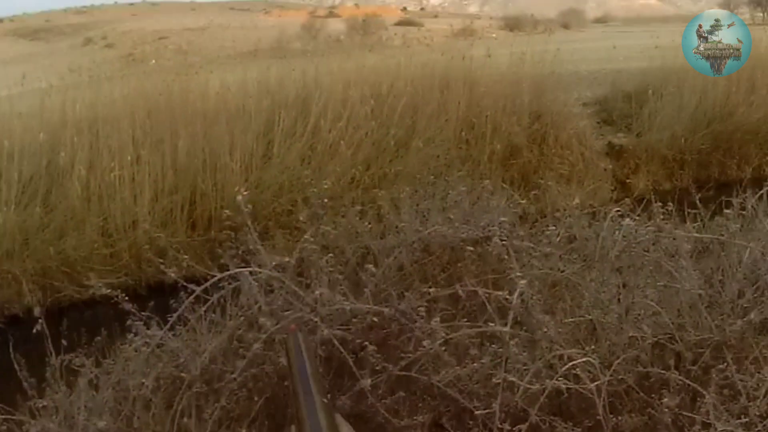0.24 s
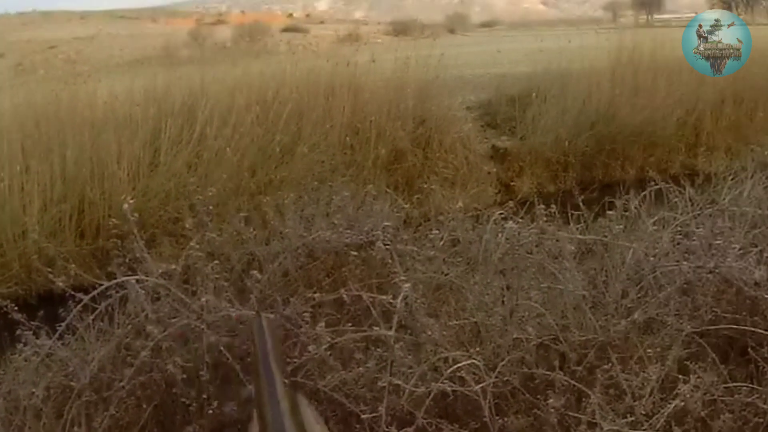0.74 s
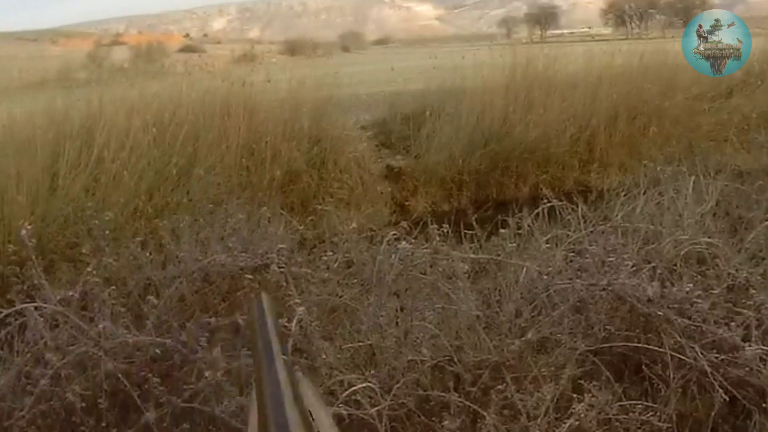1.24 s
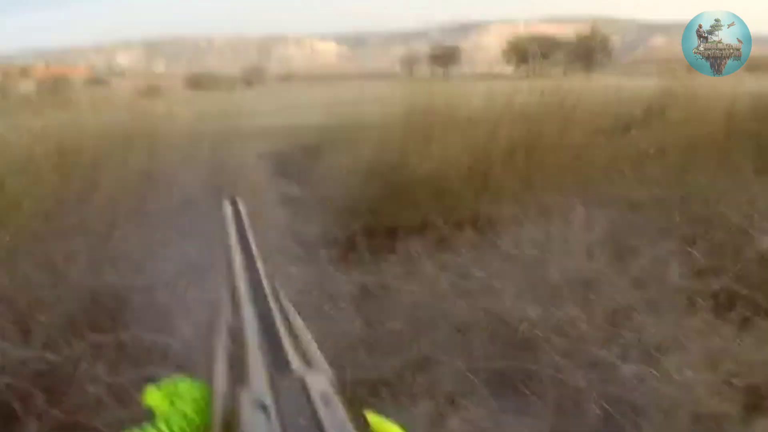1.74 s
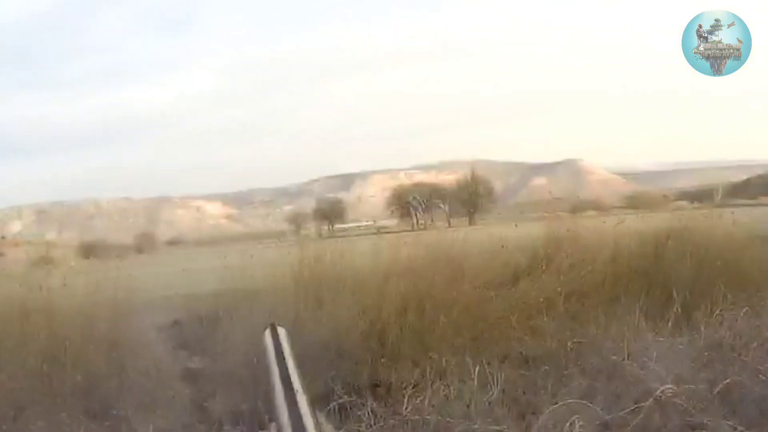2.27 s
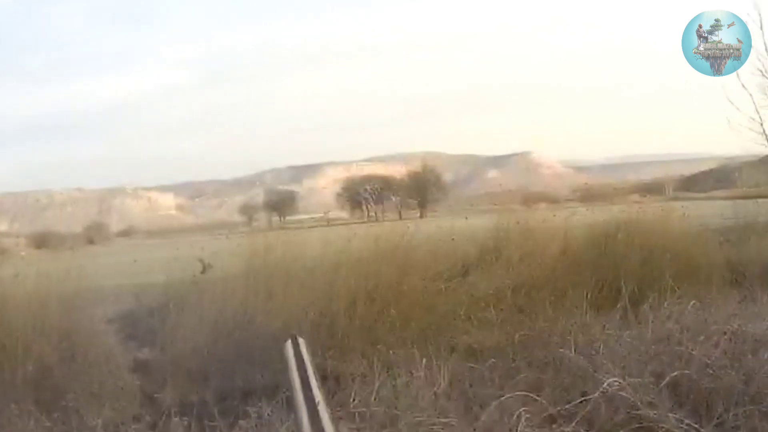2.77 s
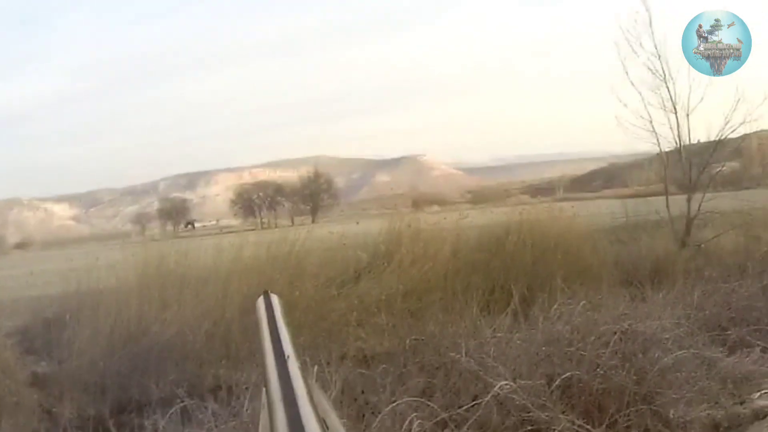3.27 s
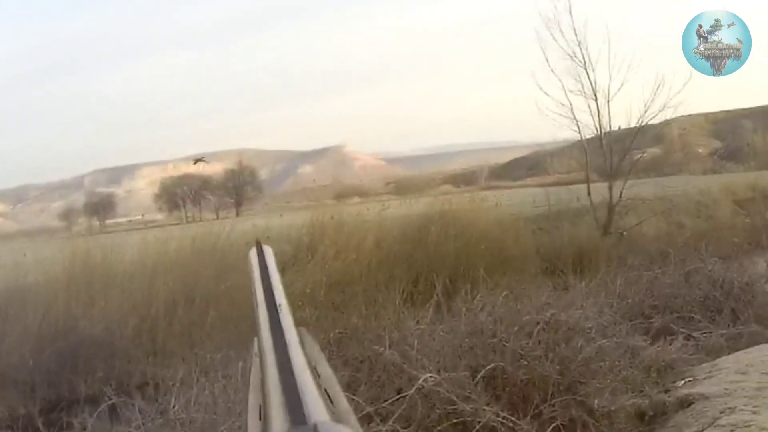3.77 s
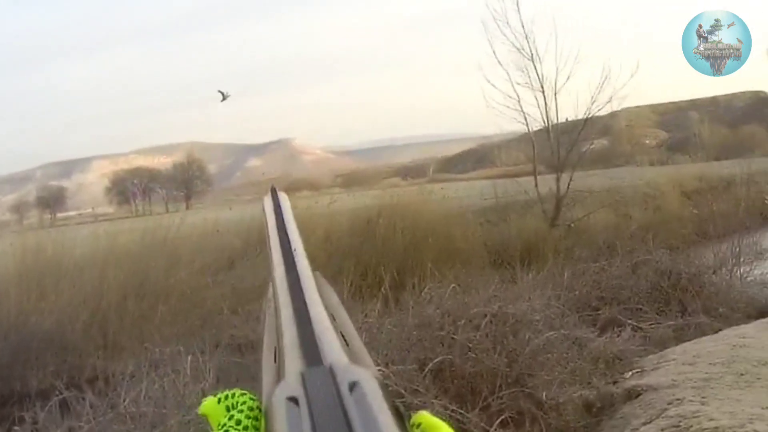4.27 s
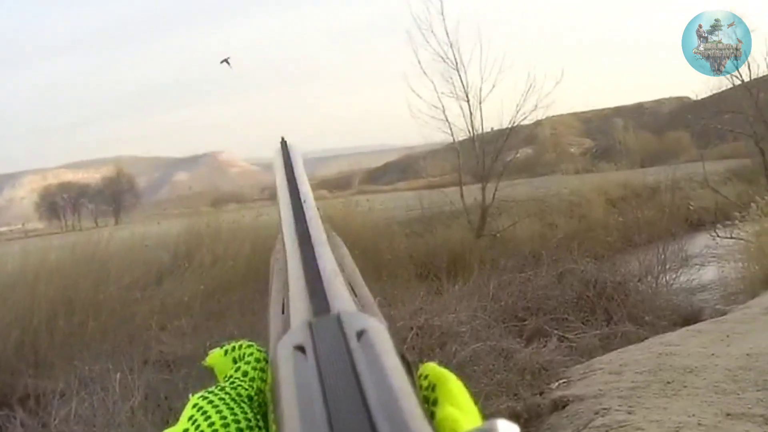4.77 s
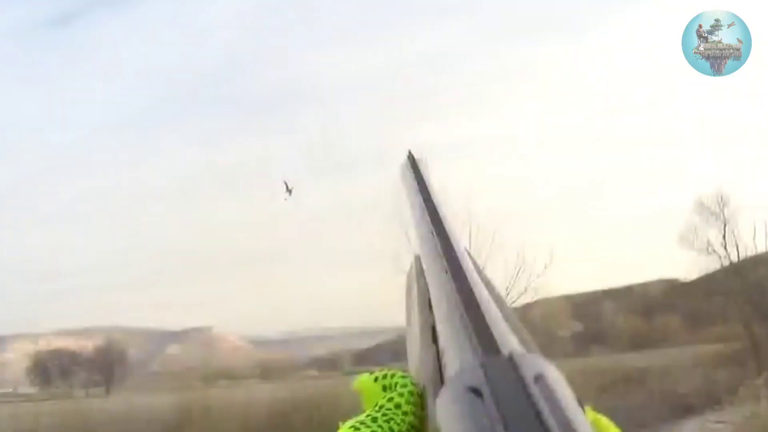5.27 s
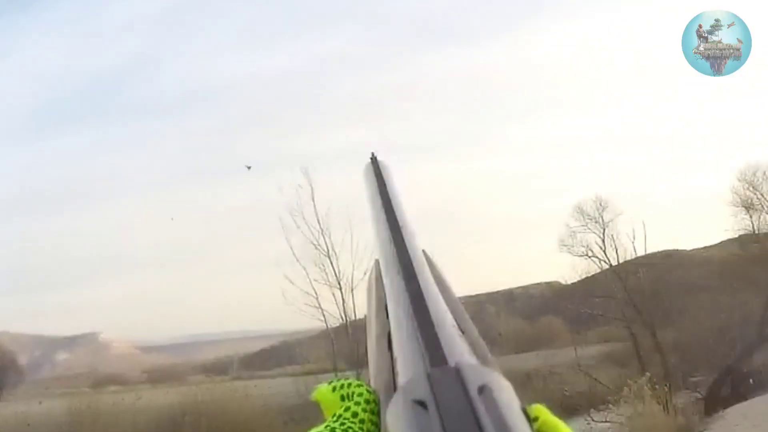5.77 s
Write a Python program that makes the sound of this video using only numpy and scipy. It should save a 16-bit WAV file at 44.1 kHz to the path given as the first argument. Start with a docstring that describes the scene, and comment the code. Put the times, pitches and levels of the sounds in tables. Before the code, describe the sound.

Two heavy shotgun blasts break near silence outdoors, a few seconds apart, recorded at the gun so that each overloads the microphone. Each shot brings a short, raspy rush from the surrounding reeds, a few small knocks as the gun settles, and dull echo thumps from far banks and trees. A rumble then rolls away across open fields, growing fainter and duller.

```python
"""Two shotgun shots over a reed bed

Each blast overloads a microphone right at the gun, scatters back from reeds and banks
and rolls away over open fields. The gun rattles as it settles after the recoil,
and far hills answer the first shot."""
import sys
import numpy as np
from scipy import signal
from scipy.io import wavfile

SR = 44100
rng = np.random.default_rng(int(sys.argv[2]) if len(sys.argv) > 2 else 0)


def master_out(mix):
    """Clip the mix to full scale and print it as 16-bit PCM to the path in sys.argv[1]."""
    frames = np.transpose(np.atleast_2d(mix))
    ceiling = np.clip(frames, -1, 1)
    pcm = np.round(ceiling * 32767).astype(np.int16)
    wavfile.write(sys.argv[1], SR, pcm)


N = 265482
TIME = np.arange(N) / SR


# Tone of the noise in the blast, the knocks and the nearest echo: pitch_hz, level_db
GUN_TONE = [(40, -6), (150, -1.5), (480, 4), (800, -6.5), (1300, -9), (2500, -16), (4300, -22.5),
            (6000, -31.5), (11000, -38.5), (16000, -47)]

def blast(push_s, suction_s, height=2.8, depth=1.99, front_s=.0016, turbulence=0.14):
    """A steep push of air inside a long, ragged suction. Returns the time before the push, and the wave."""
    age = TIME[:SR // 10] - front_s
    suction = -depth * np.sqrt(np.clip(1 - age / suction_s, 0, 1)) * np.clip(1 + age / front_s, 0, 1)
    push = height * (age >= 0) * np.clip(1 - age / push_s, 0, 1) ** .5
    ragged_air = turbulence * suction * noise(GUN_TONE, len(age))
    return front_s, low_pass(suction + push, 1500, order=2) + ragged_air


def kick(lead_s, lock_db, recoil_lead_s, fade_s=0.001):
    """The firing lock's knock, then the swelling recoil, travel through the gun ahead of the blast."""
    age = TIME[:SR // 10]
    knock = low_pass(noise(GUN_TONE, len(age)), 2900, order=1) * np.minimum(age / 0.00084, 1)
    recoil_start = lead_s - recoil_lead_s
    swell = from_db(np.interp(age, [recoil_start, lead_s], [-4, 0])) * (age > recoil_start)
    recoil = swell * noise(GUN_TONE, len(age))
    return (from_db(lock_db) * knock + recoil) * np.exp(-np.maximum(age - lead_s, 0) / fade_s)


# The two shots: start_s, level_db, push_s, suction_s, scatter_db, scatter_tilt_db_per_octave,
# reed_rasp_db, lock_db, recoil_lead_s
SHOTS = [(1.3381, -1.5, 0.0038, 0.044, -1, -1.18, -39, -10.5, 0.008),
         (4.7786, -2, 0.001834, 0.044, -4, -0.17, -28, -13.5, 0.0062)]

def shots(lead_s=.014):
    """Each shot is a kick through the gun, a blast of air and a crash thrown back from nearby."""
    out = np.zeros(N)
    for start, level_db, push_s, suction_s, scatter_db, tilt_db, rasp_db, lock_db, recoil_s in SHOTS:
        front_s, wave = blast(push_s, suction_s)
        add(out, start - lead_s, from_db(level_db) * kick(lead_s, lock_db, recoil_s))
        add(out, start - front_s, from_db(level_db) * wave)
        add(out, start, from_db(scatter_db) * shooter_bounce(scatter(tilt_db, rasp_db, suction_s)))
    return out


# Tone of the crash from nearby reeds and banks: pitch_hz, level_db
SCATTER_TONE = [(30, -7), (70, -2.5), (150, 5.5), (300, -3), (600, -11.5), (1200, -19.5), (2000, -20),
                (3200, -18), (4500, -39), (11000, -42.5), (16000, -54.5)]
# How long that crash takes to fade by 60 dB: pitch_hz, fade_s
SCATTER_FADES = [(60, 0.81), (250, 0.63), (1000, 1), (3000, 0.51), (12000, 0.69)]

def scatter(tilt_db, rasp_db, suction_s):
    """Reeds and banks throw the blast back as a dying crash that breaks through as the suction ends."""
    age = TIME[:int(1.5 * SR)]

    def shape(hz):
        return fade(age, at_hz(SCATTER_FADES, hz)) * from_db(tilt_db * np.log2(hz / 500))

    tail = noise(SCATTER_TONE, len(age), shape, patchy_db=3.5)
    rasp = reed_rasp(len(age)) * fade(age, fade_s=0.51)
    # The nearest ground returns a harder, brighter burst.
    ground = noise(GUN_TONE, len(age)) * fade(np.maximum(age - suction_s, 0), fade_s=0.073)
    release = from_db(np.interp(age, [0.7 * suction_s, suction_s], [-5, 0]))
    return (from_db(-10) * tail + from_db(-12) * ground + from_db(rasp_db) * rasp) * release


# Jolts of the recoil: start_s, length_s, height, clack_db
JOLTS = [(1.3451, 0.0011, 1.6, -24), (1.3564, 0.003, 5, -2), (1.363, 0.002, 1.3, -9),
         (1.375, 0.0029, 1.35, -6.5), (4.7952, 0.002, 2.4, -9.5), (4.807, 0.0021, 0.92, -16),
         (4.814, 0.0033, 1.4, 0.5)]

def jolts():
    """The recoil shakes the microphone during the suction, each time with a shove and a clack."""
    out, age = np.zeros(N), TIME[:SR // 4]
    for start, length_s, height, clack_db in JOLTS:
        shove = height * np.sin(np.pi * np.minimum(age / length_s, 1))
        clack = from_db(clack_db) * noise(GUN_TONE, len(age)) * fade(age, fade_s=0.038)
        add(out, start, shove + clack)
    return out


# Low ringing tones of the gun: start_s, pitch_hz, height, fade_s
SHUDDERS = [(1.3755, 106, .35, 0.2), (4.8143, 430, 0.62, 0.028), (4.8220, 205, 0.18, 0.14),
            (4.8160, 335, 0.4, .14)]

def shudders():
    """The gun shudders briefly as the suction lets go."""
    out, age = np.zeros(N), TIME[:SR // 4]
    for start, pitch_hz, height, fade_s in SHUDDERS:
        add(out, start, height * np.sin(2 * np.pi * pitch_hz * age) * fade(age, fade_s))
    return out


# Single echoes from banks and tree lines: start_s, level_db, length_s, spray_db
ECHOES = [(1.442, -8.5, 0.00904, -21.5), (1.537, -35.5, .004, -22), (1.7907, -7, .0085, -19),
          (1.867, -24, 0.014, -29.5), (2.3290, -33, 0.0066, -43), (2.834, -47.5, 0.0046, -57.5),
          (5.1548, -15, 0.0087, -23), (5.442, -19.5, 0.0039, -32.5), (5.5993, -23.5, 0.0034, -36)]
# Tone of the spray of noise around each echo: pitch_hz, level_db
ECHO_TONE = [(40, -9.5), (150, 23), (400, 15), (900, 1.5), (2500, -24), (5000, -68.5), (16000, -62.5)]

def echoes(dull_hz=650, swell_s=.006):
    """Each far bank or tree line returns a push and a pull, rounded by the air, in a spray of noise."""
    out, age = np.zeros(N), TIME[:SR // 4]
    for start, level_db, length_s, spray_db in ECHOES:
        wave = low_pass((1 - 2 * age / length_s) * (age < length_s), dull_hz, order=3)
        spray = noise(ECHO_TONE, len(age)) * swell_and_fade(age, swell_s, fade_s=0.13)
        add(out, start, from_db(level_db) * wave + from_db(spray_db) * spray)
    return out


# Knocks of the gun after the recoil: start_s, level_db, fade_s
RATTLES = [(1.609, -20.5, 0.017), (1.6840, -21.5, 0.079), (1.7010, -20.5, 0.068), (5.0528, -15, 0.04),
           (5.057, -14.5, 0.019), (5.0690, -24, 0.07), (5.2018, -23, 0.024)]
# Tone of those knocks: pitch_hz, level_db
RATTLE_TONE = [(60, -1.5), (250, 2.5), (600, 7.5), (1000, -3.5), (2200, -5.5), (3500, -13), (5000, -26),
               (12000, -32), (16000, -49.5)]

def rattles(grain_db=-1.0, rise_s=0.0016):
    """The gun settles with short, gritty knocks."""
    out, age = np.zeros(N), TIME[:SR // 5]
    for start, level_db, fade_s in RATTLES:
        grit = from_db(grain_db * drift(1100, len(age))) * np.minimum(age / rise_s, 1)
        add(out, start, from_db(level_db) * noise(RATTLE_TONE, len(age)) * grit * fade(age, fade_s))
    return out


# Stands of reeds that throw the blast back: start_s, level_db, swell_s, fade_s
REED_RUSHES = [(1.376, -23.5, 0.0028, 0.09), (1.415, -30, 0.023, 0.25), (1.664, -40.5, 0.012, 0.1),
               (1.781, -39, 0.016, 0.12), (1.890, -41.5, 0.025, 0.2), (5.138, -41.5, 0.015, 0.41)]
# Their bright tone: pitch_hz, level_db
RUSH_TONE = [(30, -36.5), (600, -18.5), (1400, 8.5), (2700, 5), (4500, -23), (12000, -23), (16000, -31.5)]

def reed_rushes(flutter_db=0.5):
    """The echoes of many stalks gather into a short, fluttering rush."""
    out, age = np.zeros(N), TIME[:SR // 3]
    for start, level_db, swell_s, fade_s in REED_RUSHES:
        rush = noise(RUSH_TONE, len(age)) * swell_and_fade(age, swell_s, fade_s)
        add(out, start, rush * from_db(level_db + flutter_db * drift(400, len(age))))
    return out


def reed_rasp(size, flutter_db=0.5):
    """Thin reed stalks return sound in a narrow, rasping band."""
    band = band_pass(rng.standard_normal(size), 2700, 3550)
    return unit_power(band) * from_db(flutter_db * drift(150, size))


# The rolling echo of each shot: delay_s, swell_s, level_db, hold_s, fall_db_per_s, treble_db,
# extra_treble_fall_db_per_s, bass_db
ROLLS = [(0.37, 0.087, -26.5, 0.045, 40, -5.5, 1.5, 4), (0.32, 0.063, -29, 0.09, 31, -5.5, 14.5, -4.5)]
# Tone of the rolling echo: pitch_hz, level_db
ROLL_TONE = [(30, -2.5), (70, -0.5), (150, 2), (320, 0), (600, -9), (1200, -10.5), (2400, -15.5),
             (4300, -48.5), (6000, -39.5), (12000, -32.5), (16000, -57.5)]

def field_roll(air_db_per_s_per_khz=7.0, lumpy_db=1.5, rasp_db=-18):
    """Countless echoes from the fields merge; the later they come, the more treble the air has taken."""
    out, age = np.zeros(N), TIME[:2 * SR]
    for (start, *_), roll in zip(SHOTS, ROLLS):
        delay_s, swell_s, level_db, hold_s, fall, treble_db, treble_fall, bass_db = roll
        loudness = from_db(level_db) * swell_hold_fall(age - delay_s, swell_s, hold_s, fall)

        def shape(hz):
            bass = bass_db * np.interp(hz, [70, 250], [1, 0])
            treble = (treble_db - treble_fall * (age - delay_s)) * treble_share(hz)
            air_loss = air_db_per_s_per_khz * age * min(hz / 1000, 5)
            return loudness * from_db(bass + treble - air_loss)

        rasp = from_db(rasp_db) * reed_rasp(len(age)) * shape(3600)
        add(out, start, noise(ROLL_TONE, len(age), shape, patchy_db=1.5) + rasp)
    return out * from_db(lumpy_db * drift(120, N))


# Far slopes that answer the first shot: delay_s, swell_s, level_db, hold_s, treble_db
SLOPES = [(1.614, 0.12, -64, 0.92, 12.5), (1.821, 0.015, -56.5, 1, -9), (1.985, 0.019, -57, 0.058, -10),
          (3.02, 0.06, -68, 0.06, 2.5), (3.303, 0.08, -63, 0.051, -0.5)]
# Tone of their answer: pitch_hz, level_db
HILL_TONE = [(40, -2), (130, -3), (210, -4.5), (300, 3.5), (420, -15), (600, -11.5), (1200, -20.5),
             (1900, -44.5), (5000, -47.5), (16000, -69.5)]

def hills(fall_db_per_s=5.5, release_db_per_s=71, air_db_per_s=7.5):
    """Each slope answers for as long as the blast sweeps along it, ever fainter and duller."""
    def shape(hz):
        power = 0
        for delay_s, swell_s, level_db, hold_s, treble_db in SLOPES:
            age = np.maximum(TIME - SHOTS[0][0] - delay_s, 0)
            treble = (treble_db - air_db_per_s * age) * treble_share(hz)
            gain = from_db(level_db - fall_db_per_s * age + treble)
            power = power + (gain * swell_hold_fall(age, swell_s, hold_s, release_db_per_s)) ** 2
        return np.sqrt(power)

    return noise(HILL_TONE, N, shape, patchy_db=2.0)


# Tone of the quiet background: pitch_hz, level_db
BACKGROUND_TONE = [(30, 12), (100, 3.5), (300, -3), (1000, -8), (4500, -13), (7000, -13), (12000, -34),
                   (16000, -38)]

def background(level_db=-70.5):
    """A very faint, steady hiss and rumble."""
    return from_db(level_db) * noise(BACKGROUND_TONE, N)


def shooter_bounce(x, delay_s=.00392, share=0.16):
    """Arriving sound glances off the shooter a moment later, which colours its tone."""
    t = TIME[:len(x)]
    return x + share * np.interp(t - delay_s, t, x, left=0)


def noise(tone, size, shape=lambda hz: 1, patchy_db=0):
    """Noise in half-octave bands; shape(hz) is a band's gain over time, patchy_db makes it waver."""
    edges_hz = 25 * 2 ** np.arange(0, 9.6, .5)
    white = rng.standard_normal((2, size + 4096))
    out, power = 0, 0
    for k, (low, high) in enumerate(zip(edges_hz, edges_hz[1:])):
        band = unit_power(band_pass(white[k % 2], low, high)[-size:])
        hz = np.sqrt(low * high)
        gain = from_db(at_hz(tone, hz)) * np.sqrt(high - low)
        out = out + gain * band * shape(hz) * from_db(patchy_db * drift(40, size))
        power += gain ** 2
    return out / np.sqrt(power)


def drift(rate_hz, size):
    """A random wander, about 1 either way."""
    points = rng.standard_normal(N // 20)
    return np.interp(np.arange(size) * rate_hz / SR, np.arange(len(points)), points)


def fade(age, fade_s):
    """Gain that falls by 60 dB in fade_s."""
    return np.exp(-np.log(1000) * age / fade_s)


def swell_and_fade(age, swell_s, fade_s):
    """Gain that rises, then fades at once."""
    return np.minimum(age / swell_s, 1) * fade(np.maximum(age - swell_s, 0), fade_s)


def swell_hold_fall(age, swell_s, hold_s, fall_db_per_s):
    """Gain that rises, holds, then falls steadily."""
    return np.clip(age / swell_s, 0, 1) * from_db(-fall_db_per_s * np.maximum(age - swell_s - hold_s, 0))


def low_pass(x, hz, order):
    """Round a wave off by dulling what lies above hz."""
    return signal.sosfilt(signal.butter(order, hz, fs=SR, output="sos"), x)


def band_pass(x, low_hz, high_hz):
    """Keep what lies between two pitches."""
    return signal.sosfilt(signal.butter(2, [low_hz, high_hz], "band", fs=SR, output="sos"), x)


def treble_share(hz):
    """0 in the bass, 1 in the treble."""
    return np.interp(np.log(hz), np.log([400, 1600]), [0, 1])


def at_hz(table, hz):
    """Read a table's value at any pitch."""
    pitches, values = np.transpose(table)
    return np.interp(np.log(hz), np.log(pitches), values)


def from_db(db):
    """Turn decibels into gain."""
    return 10 ** (np.asarray(db) / 20)


def unit_power(x):
    """Scale to an average power of 1."""
    return x / np.sqrt(np.mean(x ** 2) + 1e-20)


def add(track, start_s, sound):
    """Mix a sound in from start_s."""
    start = round(start_s * SR)
    track[start:start + len(sound)] += sound[:N - start]


def scene():
    """The shots and their echoes over a quiet background, in one channel."""
    quiet = background()
    gunfire = shots() + jolts() + shudders() + echoes()
    aftermath = shooter_bounce(rattles() + field_roll() + hills()) + reed_rushes()
    return (gunfire + aftermath + quiet)[None]


def overload(x, top, hardness):
    """Round off every peak so that it stays under the top."""
    return x / (1 + np.abs(x / top) ** hardness) ** (1 / hardness)


# A nearly silent band in the treble: time_s, lower_edge_hz, upper_edge_hz
TREBLE_GAP = [(0, 4750, 8900), (1.4, 5170, 9650), (4.9, 6320, 11800), (6.02, 6700, 12550)]

def treble_gap(x, depth_db=-30, above_db=-2):
    """A wide gap in the treble slides slowly upward; what lies above it is a little dull."""
    hz, frame_s, spectrum = signal.stft(x, SR, nperseg=256)
    time_s, lower_hz, upper_hz = np.transpose(TREBLE_GAP)
    over_upper = hz[:, None] > np.interp(frame_s, time_s, upper_hz)
    over_lower = hz[:, None] > np.interp(frame_s, time_s, lower_hz)
    gain_db = np.select([over_upper, over_lower], [above_db, depth_db], 0)
    return signal.istft(spectrum * from_db(gain_db), SR, nperseg=256)[1][..., :N]


def record(dry, recovery_hz=.62, offset=-.009, cutoff_hz=15600):
    """The microphone hits its limit and recovers slowly; its off-centre input clips; treble is cut."""
    pinned = overload(dry, top=1.35, hardness=7.8)
    recovering = signal.lfilter(*signal.butter(1, recovery_hz, "high", fs=SR), pinned)
    clipped = overload(recovering + offset, top=.71, hardness=18)
    treble_cut = signal.ellip(10, .3, 80, cutoff_hz, fs=SR, output="sos")
    return signal.sosfilt(treble_cut, treble_gap(clipped))


dry = scene()
out = record(dry)
master_out(out)
```